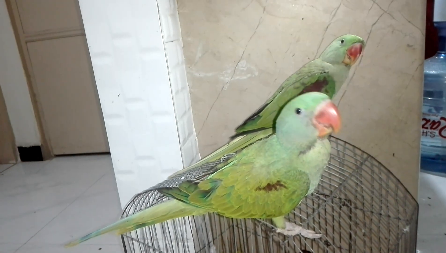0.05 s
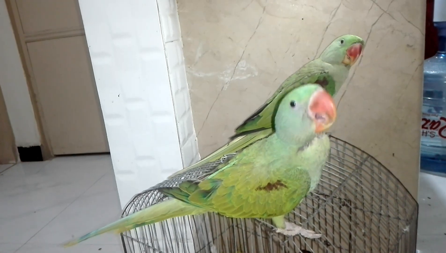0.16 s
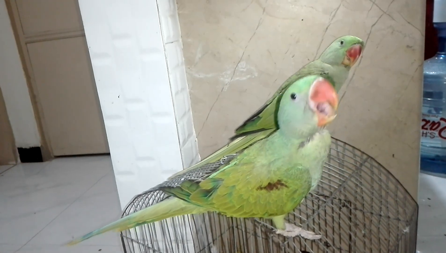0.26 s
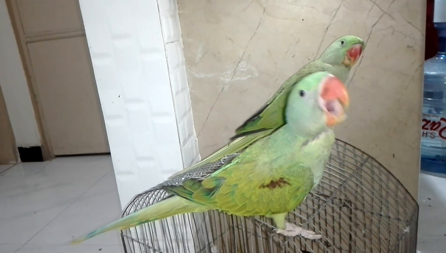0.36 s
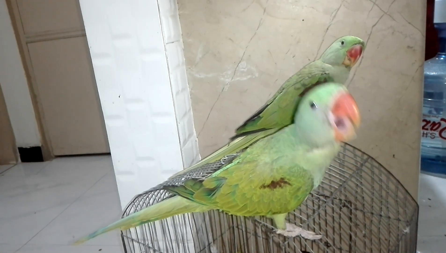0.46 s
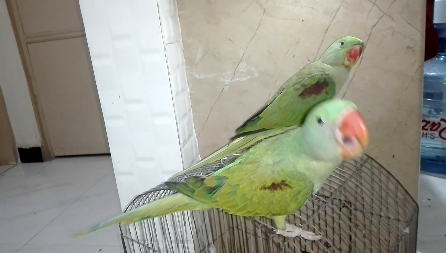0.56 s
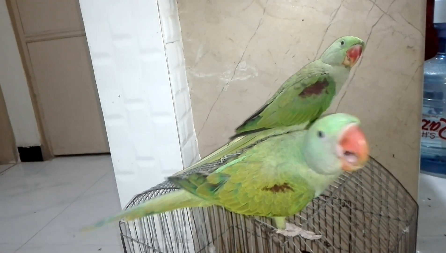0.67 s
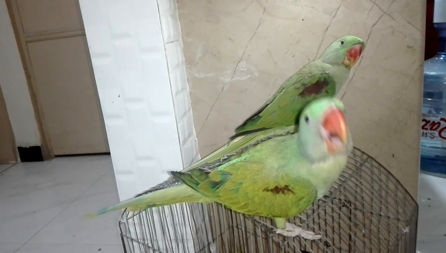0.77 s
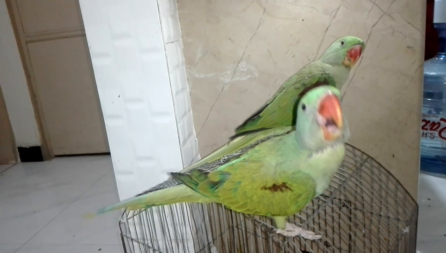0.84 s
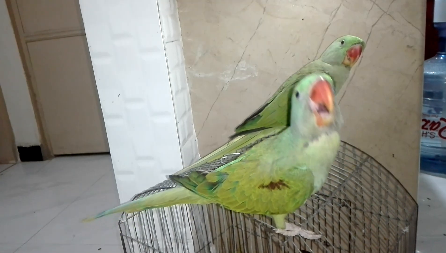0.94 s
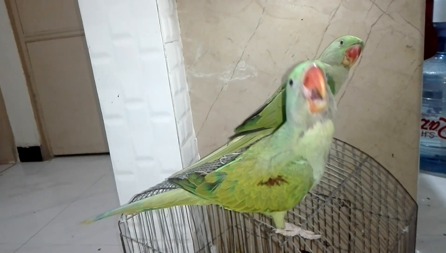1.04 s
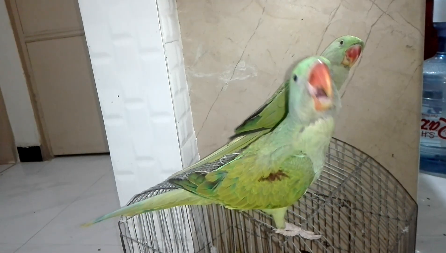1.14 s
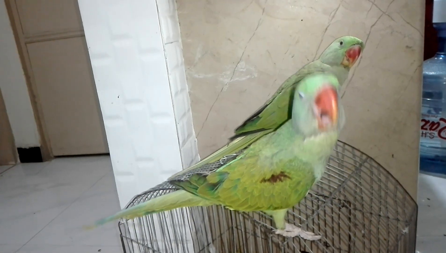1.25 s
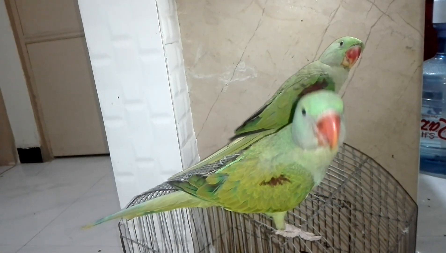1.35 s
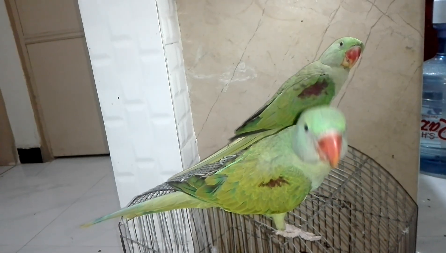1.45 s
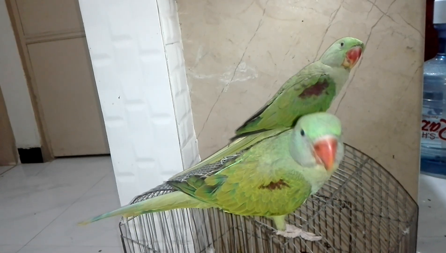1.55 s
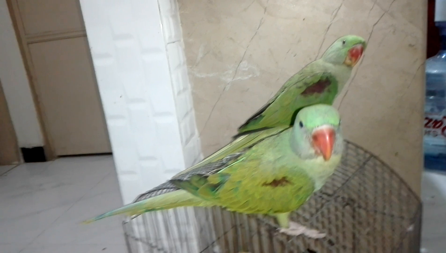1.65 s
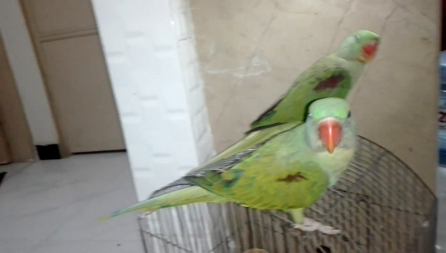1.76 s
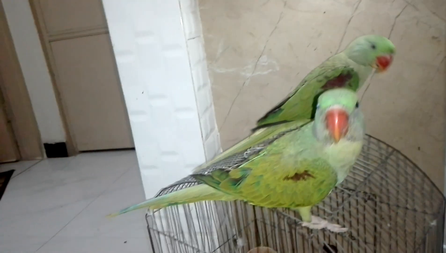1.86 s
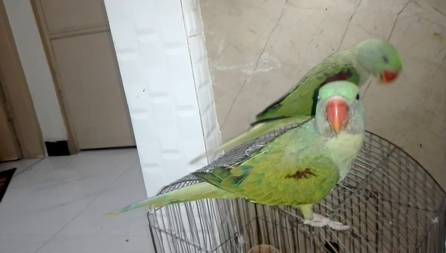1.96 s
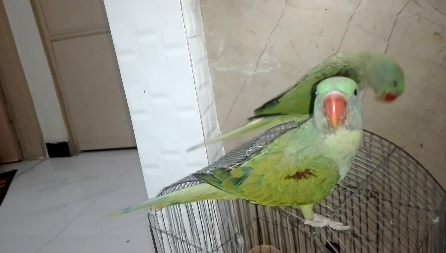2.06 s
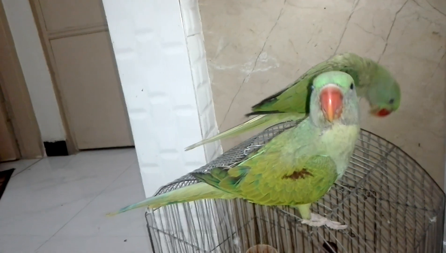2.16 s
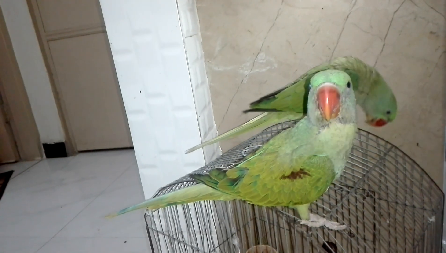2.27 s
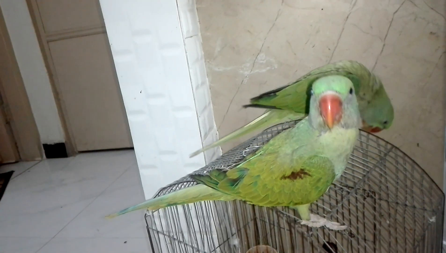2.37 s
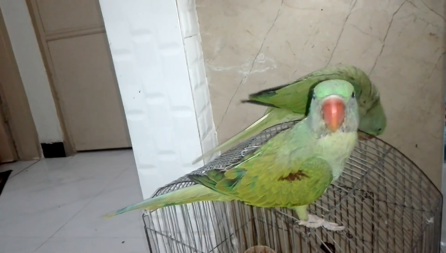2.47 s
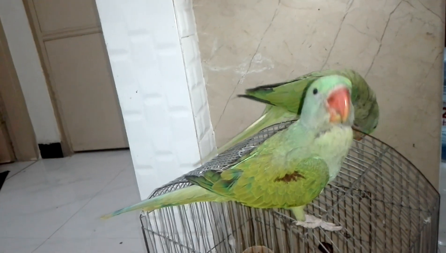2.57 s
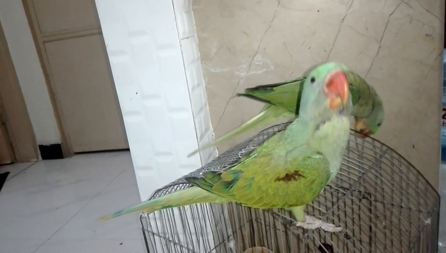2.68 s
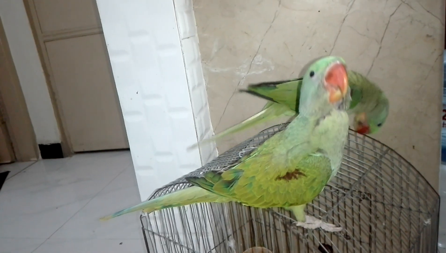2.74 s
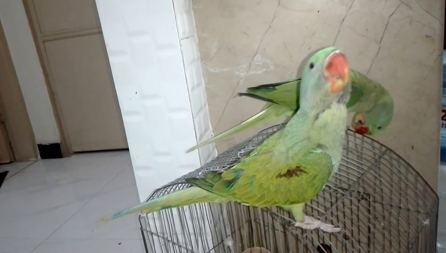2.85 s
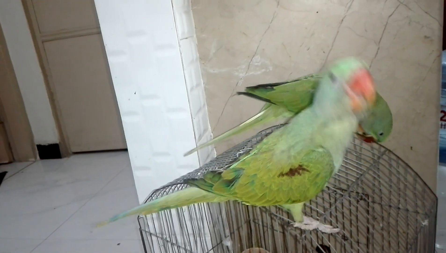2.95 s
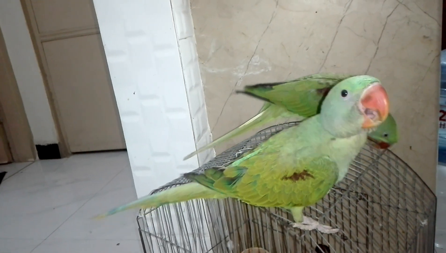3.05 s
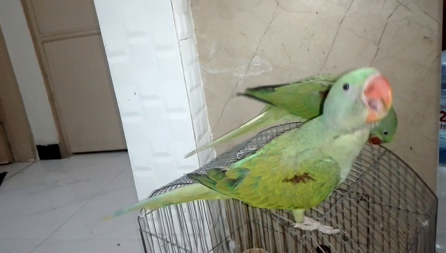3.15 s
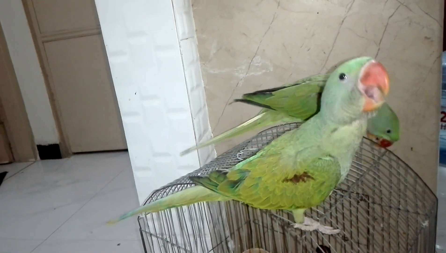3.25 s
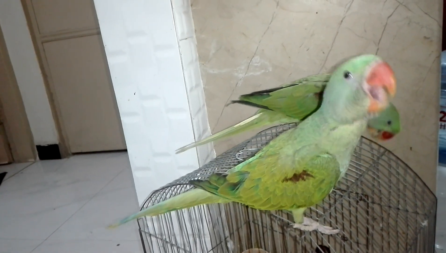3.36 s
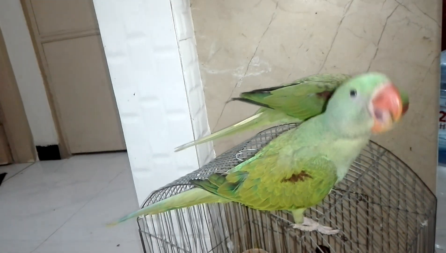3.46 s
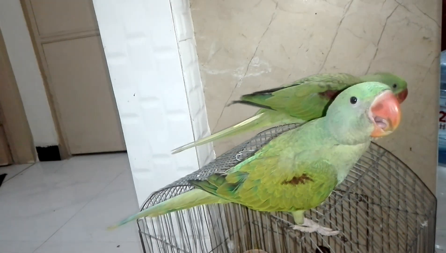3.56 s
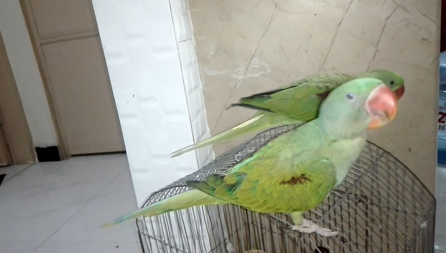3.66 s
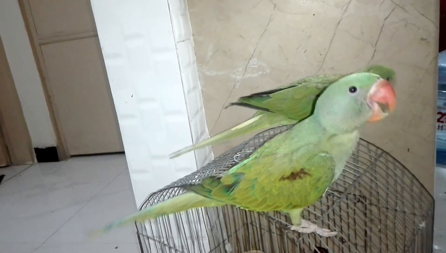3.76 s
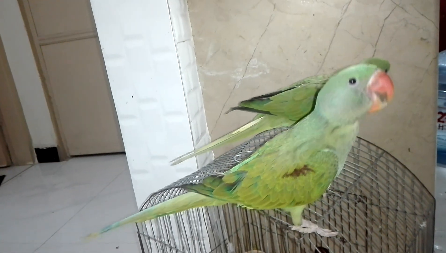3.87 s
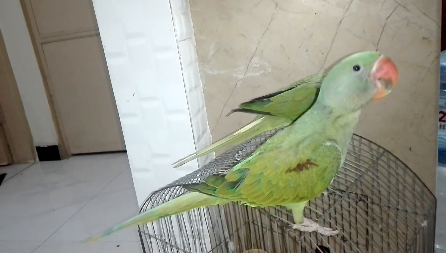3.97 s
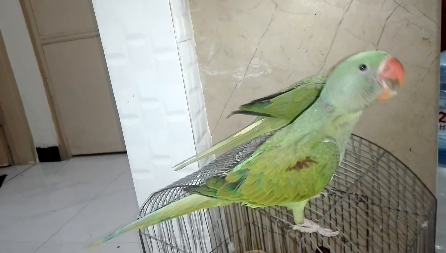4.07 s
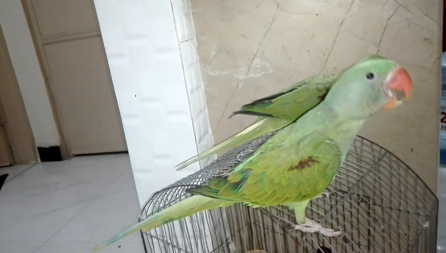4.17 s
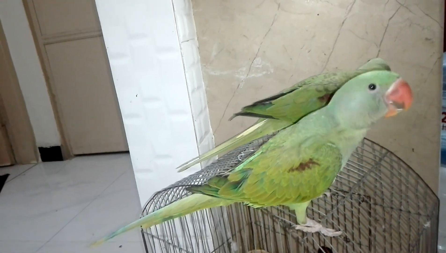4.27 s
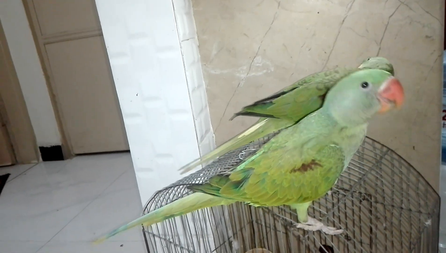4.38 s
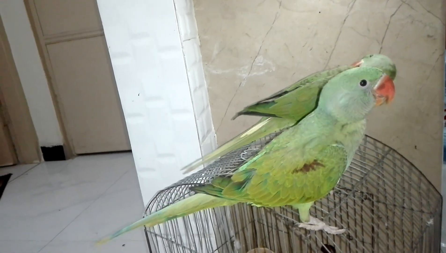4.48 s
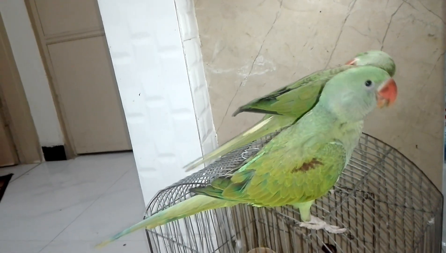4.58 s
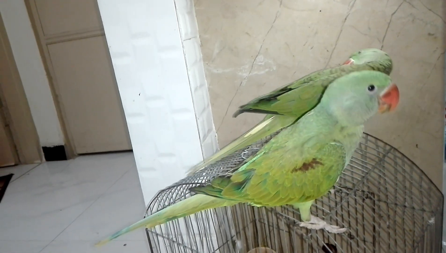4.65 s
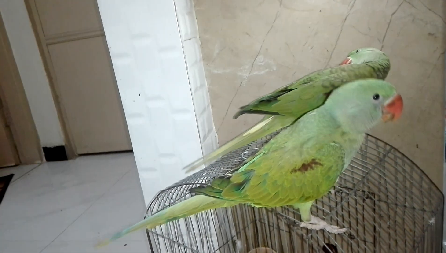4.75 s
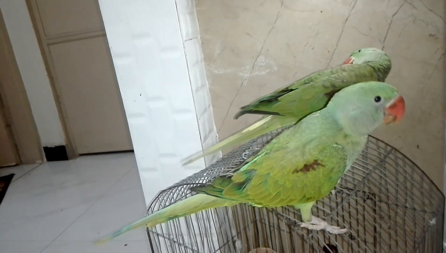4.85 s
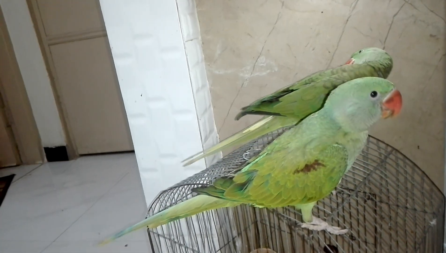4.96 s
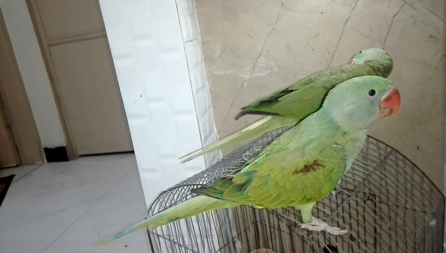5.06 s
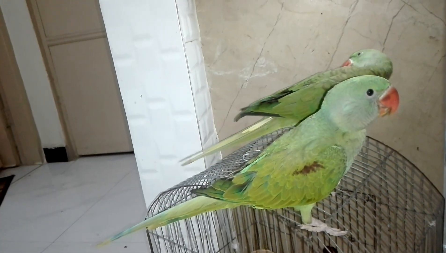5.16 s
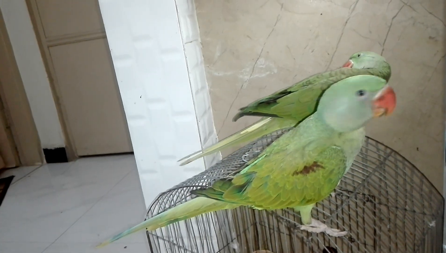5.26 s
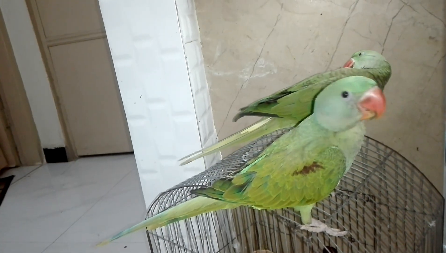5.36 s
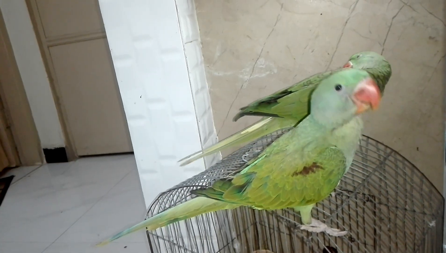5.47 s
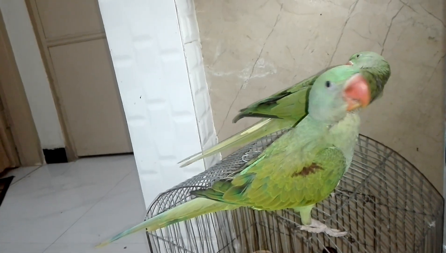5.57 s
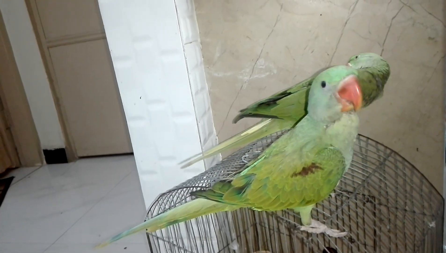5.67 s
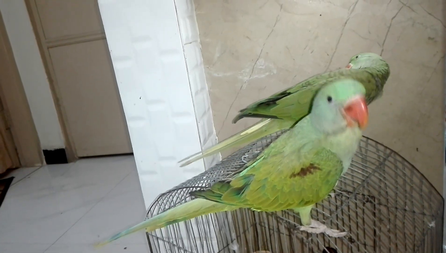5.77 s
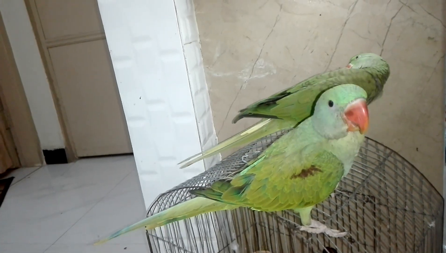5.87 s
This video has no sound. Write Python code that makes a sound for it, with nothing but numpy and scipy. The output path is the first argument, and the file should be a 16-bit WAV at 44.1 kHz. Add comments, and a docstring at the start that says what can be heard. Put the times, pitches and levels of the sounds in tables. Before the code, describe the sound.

A large parakeet close to the microphone gives two loud, harsh squawks, pauses for nearly two seconds, then gives two more. Each call is a reedy, rapidly warbling tone that swells and sinks in pitch, with a short room echo. A couple of light ticks fall in the pause, and faint bird whistles come from far off. A steady low rumble and soft handling bumps lie underneath.

```python
"""A large parakeet on top of its cage gives two pairs of harsh squawks in a tiled room.
Each squawk is one reedy tone from its voice box, shaped by its throat and beak. The pitch swoops
up and down about 26 times a second: broken yelps at first, then joined, sinking and narrowing.
Behind it are small ticks, faint distant bird whistles, bumps on the hand-held microphone
and a steady low rumble."""
import sys
import numpy as np
from scipy import signal
from scipy.fft import rfft, irfft
from scipy.io import wavfile
from scipy.ndimage import uniform_filter1d, minimum_filter1d

SR = 44100
rng = np.random.default_rng(int(sys.argv[2]) if len(sys.argv) > 2 else 0)


def put_to_file(sound):
    """Save the sound as 16-bit audio at rate SR, in the file named by the first command-line argument."""
    columns = np.atleast_2d(sound).T  # one column per channel
    safe = np.clip(columns, -1, 1)
    whole_steps = np.round(safe * 32767)
    wavfile.write(sys.argv[1], SR, whole_steps.astype(np.int16))


N = 261072
TIME = np.arange(N) / SR


# How throat and beak shape the voice, facing us and turned aside: frequency_hz, gain_db
THROAT_FACING = [(850, -29), (1400, -14), (1850, -7.5), (2060, -1.5), (2550, -6), (3100, -5), (3750, -18.5),
                 (4400, -14), (5600, -22.5), (6500, -23.5), (7600, -35), (9600, -45.5), (13000, -39),
                 (14300, -48)]
THROAT_ASIDE = [(850, -22), (1400, -13.5), (1850, -4.5), (2060, -0.5), (2350, -4.5), (2650, -7),
                (2950, -0.5), (3150, 1), (3700, -17), (4200, -13), (5600, -16.5), (6500, -16.5),
                (7600, -26.5), (9600, -41.5), (13000, -46), (14300, -37)]
# The softer glide that opens each squawk (a dip is the bottom of a swoop, a crest its top):
# start_s, start_hz, midway_hz, first_dip_hz, glide_db, first_dip_db
OPENINGS = [(.199, 1479, 1125, 928, -19, -13), (.831, 1101, 1355, 878, -19, -14),
            (3.074, 1176, 1628, 1003, -21.5, -14.5), (3.734, 973, 778, 779, -20.5, -16.5)]
# The warble that follows, swelling to a climax and sinking (a share runs from 0 to 1):
# first_dip_s, last_regular_dip_s, closing_dip_s, climax_share, climax_db, late_db, closing_db
WARBLES = [(0.2225, 0.5938, 0.63, 0.42, -8.5, -16, -20.5), (0.8646, 1.216, 1.239, .38, -9.5, -16.5, -20),
           (3.1088, 3.4869, 3.529, .31, -8, -15.5, -17.5), (3.7555, 4.136, 4.178, .31, -12.5, -16, -16)]
# The pitches each warble swings between: highest_dip_share, highest_dip_hz, late_dip_hz,
# first_crest_hz, climax_crest_hz, late_crest_hz, closing_hz
PITCH_RANGES = [(.17, 1280, 1040, 1970, 1965, 1280, 850), (.22, 1185, 1000, 1720, 1990, 1210, 960),
                (.1, 1265, 1015, 1890, 1940, 1315, 928), (.3, 1072, 987, 1680, 1950, 1310, 962)]

def parakeet():
    """Four squawks: three facing us, the last with the head turned aside."""
    first, second, third, fourth = map(swoop_plan, OPENINGS, WARBLES, PITCH_RANGES)
    return (squawk(first, THROAT_FACING, gain_db=-1, tilt_db=1.5, closing_db=-3.5,
                   jitter=.0079, hiss_db=-23, release_s=.0069)
            + squawk(second, THROAT_FACING, gain_db=-1, tilt_db=2, closing_db=-2.5,
                     jitter=.0076, hiss_db=-28, release_s=.0041)
            + squawk(third, THROAT_FACING, gain_db=0, tilt_db=1.36, closing_db=-3,
                     jitter=.011, hiss_db=-21, release_s=.0042)
            + squawk(fourth, THROAT_ASIDE, gain_db=-1, tilt_db=1, closing_db=-7,
                     jitter=.0084, hiss_db=-20, release_s=.01))


# The voice box rasps before it settles on a pitch: time_s, length_s, roughness (0 to 1)
RASPS = [(.228, 0.0054, 0.61), (0.834, 0.012, 0.88), (3.077, 0.0092, 0.98), (3.739, 0.0053, 0.5),
         (3.768, .008, 0.3)]
# Strength of the three lowest harmonics at the voice box: gain_db
LOW_HARMONICS_DB = [0., 0., -1.5]

def squawk(swoops, throat, gain_db, tilt_db, closing_db, jitter, hiss_db, release_s):
    """Shaky harmonics (multiples of the pitch) ring in the throat, and air hisses with each vibration."""
    start, end = swoops[0][0], swoops[-1][0] + release_s
    span = (TIME > start - .01) & (TIME < end + .01)
    t = TIME[span]
    pitch, level_db, catch = swoop_track(swoops, t)
    rasp = .21 * catch + sum(rough * np.exp(-(2 * (t - s) / length) ** 2) for s, length, rough in RASPS)
    shake = (jitter + .131 * rasp) * wander(len(t), hz=792)
    pitch = pitch * (1 + shake + .00573 * wander(len(t), hz=150))
    phase = 2 * np.pi * np.cumsum(pitch) / SR
    # Brightness, in dB per octave: the closing beak dulls it, and so do strained high notes.
    beak_closed = np.clip(1 - (end - t) / .23, 0, 1)
    strain = np.maximum(np.log2(pitch / 1490), 0)
    slope_db = tilt_db + closing_db * beak_closed - 22 * strain
    tone = 0
    for k in range(1, 17):
        harmonic_hz = k * pitch
        octaves = max(np.log2(k / 2), 0)  # above the second harmonic
        # Every harmonic flickers, the upper ones more as the call goes on.
        flicker_db = 1.43 + 2.5 * min(octaves, 1) * (t - start) / (end - start)
        harmonic_db = at_hz(throat, harmonic_hz) + windpipe_db(harmonic_hz) + slope_db * octaves
        harmonic_db += flicker_db * wander(len(t), hz=167)
        harmonic_db += LOW_HARMONICS_DB[k - 1] if k <= len(LOW_HARMONICS_DB) else 0
        tone += np.sqrt(2) * from_db(harmonic_db) * np.sin(k * phase) * (harmonic_hz < SR / 2)
    air = coloured(rng.standard_normal(len(t)) * (1 + np.cos(phase)), throat)
    # The hiss sits above the main harmonics; a rasp reaches much lower.
    hiss = from_db(hiss_db) * rms_one(filtered(filtered(air, 4700, "high"), 4700, "high"))
    rattle = .38 * rasp * rms_one(filtered(air, 1200, "high"))
    out = np.zeros(N)
    out[span] = (tone + hiss + rattle) * from_db(level_db + gain_db) * voicing(t, start, end)
    return out


# The voice weakens at the crests, most in the strained early ones: warble_share, gain_db
CREST_LOSS = [(0, -6), (.25, -8), (.45, -6.5), (.6, -1.5), (1, -3.5)]

def swoop_plan(opening, warble, pitch_range, swoops_per_s=26.2, quickening=.02764):
    """Lay out one squawk's slowly quickening swoops: time_s, dip_hz, crest_hz, dip_db, crest_db."""
    start, start_hz, midway_hz, low_hz, glide_db, first_db = opening
    first, last, close, climax, climax_db, late_db, close_db = warble
    turn, high_dip_hz, late_dip_hz, first_crest_hz, top_hz, late_crest_hz, close_hz = pitch_range
    count = round((last - first) * swoops_per_s)
    at_dip = np.arange(count + 1) / count
    at_crest = at_dip + .5 / count
    times = first + (last - first) * at_dip * (1 + quickening * (1 - at_dip))
    # The dips climb fast, then level out as they sink.
    rising = high_dip_hz + (low_hz - high_dip_hz) * np.clip(1 - at_dip / turn, 0, 1) ** 2.2
    sinking = late_dip_hz + (high_dip_hz - late_dip_hz) * ((1 - at_dip) / (1 - turn)) ** 1.7
    dip_hz = np.where(at_dip < turn, rising, sinking)
    # After the climax the crests fall steadily.
    fall_hz = (top_hz - late_crest_hz) * np.maximum(at_crest - climax, 0) / (1 - climax)
    crest_hz = np.interp(at_crest, [0, climax], [first_crest_hz, top_hz]) - fall_hz
    dip_db, effort_db = np.interp([at_dip, at_crest], [0, climax, 1], [first_db, climax_db, late_db])
    crest_db = effort_db + np.interp(at_crest, *np.transpose(CREST_LOSS))
    return np.vstack([(start, start_hz, midway_hz, glide_db, glide_db),
                      np.c_[times, dip_hz, crest_hz, dip_db, crest_db],
                      (close, close_hz, close_hz, close_db, close_db)])


def swoop_track(swoops, t, dwell=.8, settling=1.5, catch_at=.382, snap=6.3):
    """The voice swings from dip to crest and back, resting ever longer in the dips."""
    dips, dip_hz, crest_hz, dip_db, crest_db = np.transpose(swoops)
    turns = np.arange(2 * len(dips) - 1)  # even at dips, odd at crests
    turn_hz = np.c_[dip_hz, crest_hz].ravel()[:-1]
    turn_db = np.c_[dip_db, crest_db].ravel()[:-1]
    turn_s = np.interp(turns / 2, np.arange(len(dips)), dips)
    place = np.interp(t, turn_s, turns)
    progress = np.interp(t, dips[[0, -1]], [0, 1])
    # Early swoops climb quickly out of each dip and drop fast; late ones slide down and flick up.
    lean = .298 * progress - .096 * (1 - progress)
    sharpness = (dwell + settling * progress) * (1 + lean * np.sin(np.pi * place))
    swing = (np.sin(np.pi * place / 2) ** 2) ** sharpness
    nearest_dip = 2 * np.round(place / 2)
    falling = place < nearest_dip
    pitch = np.interp(nearest_dip + np.where(falling, -swing, swing), turns, turn_hz)
    # Going down, the voice box membranes catch and jump to full strength; going up, they fade.
    slack = (1 + np.tanh(snap * (swing - catch_at))) / 2
    level_db = np.interp(nearest_dip + np.where(falling, -slack, swing), turns, turn_db)
    catch = 4 * slack * (1 - slack) * falling * (1 - progress)
    return pitch, level_db, catch


# The voice cuts out at the top of some early swoops: stop_s, resume_s
VOICE_BREAKS = [(.236, .249), (.275, .2935), (.32, .328), (.883, .902), (.92, .942), (3.125, 3.1425),
                (3.162, 3.178)]

def voicing(t, start, end, edge_s=.0021, fade_s=.007):
    """1 while the voice box vibrates, 0 in its breaks and outside the call, with soft edges."""
    on = t > start
    for stop, resume in VOICE_BREAKS:
        on &= (t < stop) | (t > resume)
    fade = np.clip(.5 + (end - t) / fade_s, 0, 1)
    return uniform_filter1d(on * 1., int(edge_s * SR)) * fade


# Narrow bands where the windpipe rings: centre_hz, width_hz, boost_db
WINDPIPE = [(2101, 82, 3), (3020, 510, 0), (4310, 300, 3), (6390, 230, 4), (8560, 510, 6.5),
            (13000, 890, 2.5)]

def windpipe_db(hz):
    """A harmonic grows louder as it sweeps through a band where the windpipe rings."""
    return sum(db / (1 + (2 * (hz - centre) / width) ** 2) for centre, width, db in WINDPIPE)


# Light taps: start_s, level_db
TICKS = [(1.742, -42), (2.694, -50.5)]
# Their tone colour: frequency_hz, gain_db
TICK_COLOUR = [(1200, -25), (2400, -5), (3200, -3), (4000, 4), (4600, -15), (7000, -26), (12000, -30)]

def ticks(fade_s=.033):
    """Taps of beak or claw, each a burst of noise that dies quickly."""
    envelope = sum(from_db(db - 60 * np.clip((TIME - s) / fade_s, 0, 2)) * (TIME > s) for s, db in TICKS)
    return envelope * rms_one(coloured(rng.standard_normal(N), TICK_COLOUR))


# Far-off birds, one list of points for each whistle: time_s, pitch_hz, level_db
WHISTLES = [
    [(2.16, 2950, -70), (2.24, 3050, -64), (2.31, 3250, -67), (2.36, 3750, -59), (2.39, 4150, -60)],
    [(4.87, 2790, -64), (4.95, 2770, -61), (5.06, 2880, -64), (5.13, 3150, -64), (5.18, 3700, -64)],
    [(5.25, 3240, -73), (5.65, 3250, -68), (5.92, 3240, -69)],
    [(5.25, 3660, -71), (5.92, 3650, -73)],
]

def whistle(points, waver=.007, waver_per_octave=.028):
    """A distant bird's thin tone, which grows less steady if it curls upward."""
    times, hz, level_db = np.transpose(points)
    pitch = np.interp(TIME, times, hz)
    unsteadiness = waver + waver_per_octave * np.log2(pitch / hz[0])
    pitch = pitch * (1 + unsteadiness * wander(N, hz=149))
    sounding = (TIME > times[0]) & (TIME < times[-1])
    gain = filtered(from_db(np.interp(TIME, times, level_db)) * sounding + 1e-18, 60, "low")
    flutter = from_db(3 * wander(N, hz=35))
    return np.sqrt(2) * gain * flutter * np.sin(2 * np.pi * np.cumsum(pitch) / SR)


# Bumps on the microphone: peak_s, level_db, length_s, top_hz
BUMPS = [(0.036, -25, 0.028, 90), (.07, -29, 0.03, 79), (.44, -32, .03, 70), (0.633, -29, 0.067, 100),
         (2.343, -28, 0.048, 87), (3.056, -29.5, 0.037, 59.7), (3.491, -19.5, 0.021, 135),
         (3.95, -33.5, 0.14, 70), (5.44, -22.5, .022, 85), (5.49, -25.5, 0.015, 228)]

def bumps():
    """Soft low thuds carried through the hand that holds the microphone."""
    out = np.zeros(N)
    for peak_s, level_db, length_s, top_hz in BUMPS:
        swell = np.exp(-((TIME - peak_s) / length_s) ** 2)
        thud = swell * filtered(wander(N, hz=top_hz), [22, top_hz], "band")
        out += from_db(level_db) * thud * np.sqrt(np.sum(swell ** 2) / np.sum(thud ** 2))
    return out


# Tone colour of the rumble: frequency_hz, gain_db
RUMBLE_COLOUR = [(15, -32), (25, -1.5), (65, -1), (144, -9.5), (301, -8), (363, -15), (448, -20),
                 (616, -25.5), (868, -20), (1290, -21), (2310, -31), (3930, -38), (4370, -43.5),
                 (14000, -53)]
# Low humming tones: pitch_hz, level_db
HUM_TONES = [(85, -47.5), (129, -49), (166, -50)]

def background(rumble_db=-37):
    """A steady rumble of noise with a few wavering hums."""
    rumble = from_db(rumble_db) * rms_one(coloured(rng.standard_normal(N), RUMBLE_COLOUR))
    hum = 0
    for pitch_hz, level_db in HUM_TONES:
        phase = 2 * np.pi * np.cumsum(pitch_hz + 4 * wander(N, hz=5.9)) / SR
        hum += from_db(level_db) * np.sqrt(2) * np.sin(phase)
    return rumble + hum


def wall_echo(x, level_db=-17, delay_s=.00242):
    """One clear bounce off the wall behind the bird."""
    return from_db(level_db) * np.interp(TIME - delay_s, TIME, x, left=0)


# How long the room takes to fade by 60 dB: frequency_hz, fade_s
ROOM_FADE = [(1000, 0.87), (2100, 0.7141), (4000, 0.6753), (7000, 0.8), (14000, 0.3)]
# Colour of the first echoes, which catch treble beamed past the microphone: frequency_hz, gain_db
EARLY_COLOUR = [(800, -11), (2100, -4.5), (3000, 2), (4500, 0.5), (7000, -1.5), (14000, 3)]
# Colour of the lingering tail: frequency_hz, gain_db
TAIL_COLOUR = [(800, 2.5), (2100, 0.5), (3000, -1.5), (4500, -1.5), (6500, -5.5), (9000, -2), (14000, -3)]

def room(x, early_db, tail_db, early_fade_s=.06, gap_s=.0007, echoes_per_s=2500):
    """Echoes scatter off the near wall and floor, then blur into a tail whose top end dies first."""
    t = TIME[:SR]
    arrived = t > gap_s
    early = rng.standard_normal(SR) * (rng.random(SR) < echoes_per_s / SR)
    early *= from_db(-60 * t / early_fade_s) * arrived
    edges_hz = np.geomspace(500, 16000, 11)
    tail = 0
    for low, high in zip(edges_hz, edges_hz[1:]):
        band = filtered(rng.standard_normal(SR), [low, high], "band")
        tail += band * from_db(-60 * t / at_hz(ROOM_FADE, np.sqrt(low * high))) * arrived
    early = from_db(early_db) * coloured(rms_one(early), EARLY_COLOUR)
    tail = from_db(tail_db) * coloured(rms_one(tail), TAIL_COLOUR)
    response = (early + tail) * (t < .9) / np.sqrt(SR)
    return signal.fftconvolve(x, response)[:N]


# Stereo width, as the level of the sides against the middle: frequency_hz, side_db
STEREO_WIDTH = [(2500, -67.5), (3500, -58), (4500, -32), (6000, -18.5), (8500, -8), (14000, -11.5)]

def widened(x, spread_s=.035):
    """The high treble is spread a little between left and right; lower sounds stay centred."""
    scatter = rng.standard_normal(int(spread_s * SR))
    scatter /= np.sqrt(np.sum(scatter ** 2))
    side = coloured(signal.fftconvolve(x, scatter)[:N], STEREO_WIDTH)
    return np.array([x + side, x - side])


def limited(x, ceiling_db, hold_s=.0036):
    """A fast limiter turns down the tops of the loudest swoops."""
    size = int(hold_s * SR)
    gain = np.minimum(1, from_db(ceiling_db) / (np.abs(x).max(axis=0) + 1e-9))
    return x * uniform_filter1d(minimum_filter1d(gain, size), size)


def from_db(db):
    """Turn decibels into a number to multiply by."""
    return 10 ** (np.asarray(db) / 20)


def rms_one(x):
    """Scale a signal to an average power of 1."""
    return x / np.sqrt(np.mean(x ** 2) + 1e-20)


def at_hz(points, hz):
    """Read between the rows of a frequency table, with octaves evenly spaced."""
    freqs, values = np.transpose(points)
    return np.interp(np.log(np.maximum(hz, 1)), np.log(freqs), values)


def coloured(x, colour):
    """Boost or cut each frequency by a table of frequency_hz, gain_db."""
    size = x.shape[-1]
    return irfft(rfft(x) * from_db(at_hz(colour, np.fft.rfftfreq(size, 1 / SR))), size)


def filtered(x, hz, kind):
    """Gently keep the lows, the highs or a band."""
    return signal.sosfilt(signal.butter(2, hz, kind, fs=SR, output="sos"), x)


def wander(size, hz):
    """A random wobble, mostly slower than hz and about 1 in size."""
    return rms_one(filtered(rng.standard_normal(size + SR), hz, "low")[SR // 2:])[-size:]


def scene():
    """The bird close in front, the room around it, whistles from far off."""
    bird = parakeet()
    near = bird + wall_echo(bird) + ticks()
    far = sum(whistle(points) for points in WHISTLES)
    far = far + room(far, early_db=-6, tail_db=-7)
    near = near + room(near, early_db=-14.5, tail_db=-11.5)
    return widened(near + far + background() + bumps())


def record(dry, cutoff_hz=14300):
    """Peaks are held down and the highest treble is cut steeply."""
    treble_cut = signal.ellip(10, .1, 80, cutoff_hz, fs=SR, output="sos")
    return signal.sosfilt(treble_cut, limited(dry, ceiling_db=-4.5))


dry = scene()
out = record(dry)
put_to_file(out)
```